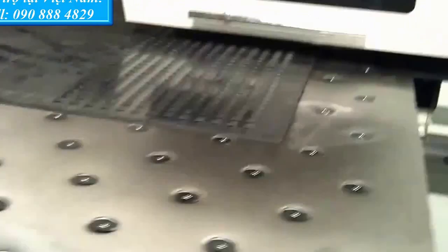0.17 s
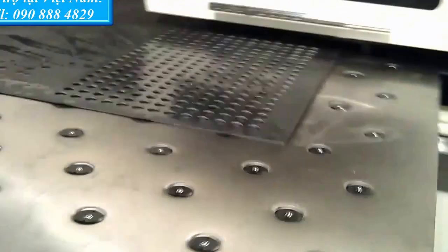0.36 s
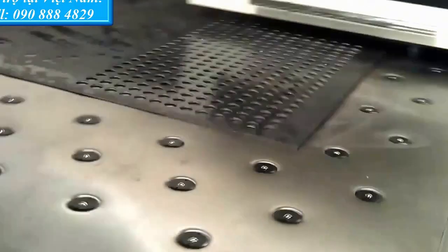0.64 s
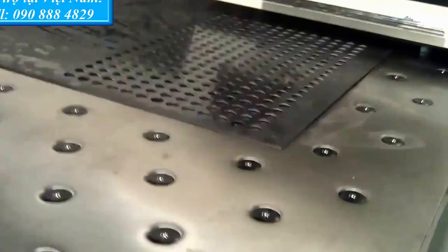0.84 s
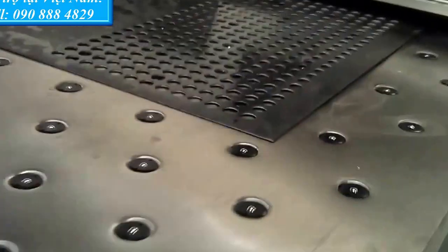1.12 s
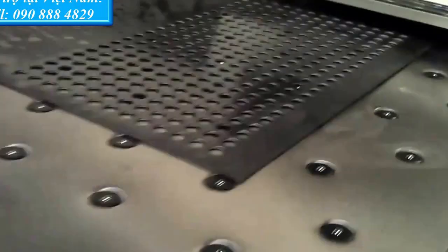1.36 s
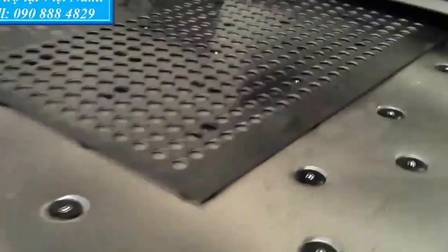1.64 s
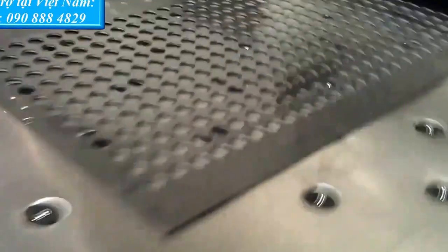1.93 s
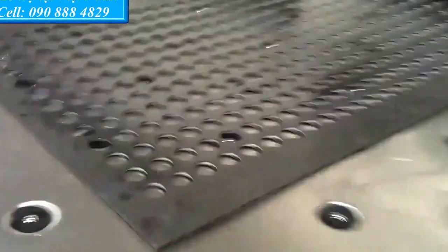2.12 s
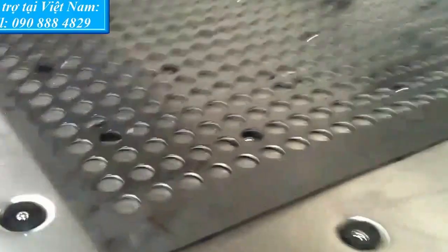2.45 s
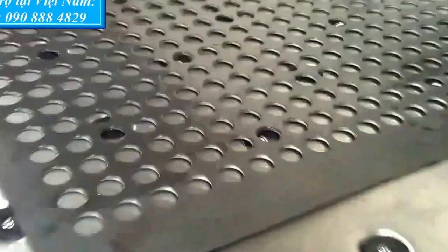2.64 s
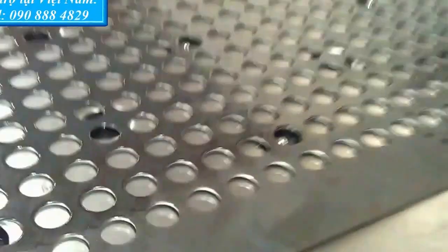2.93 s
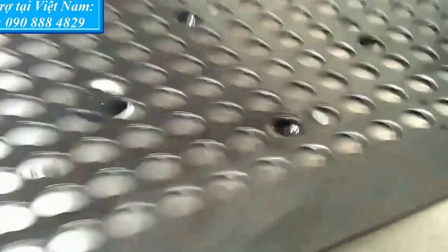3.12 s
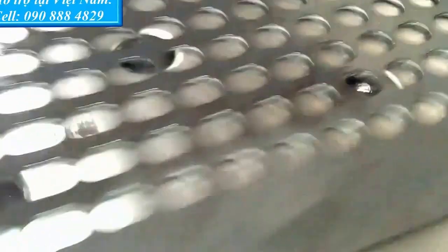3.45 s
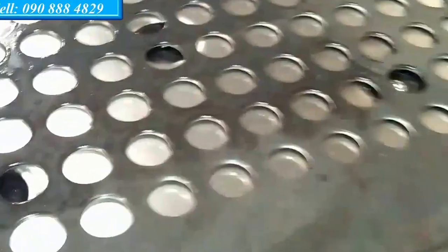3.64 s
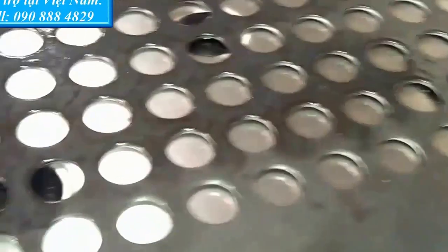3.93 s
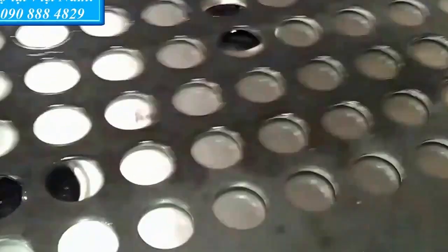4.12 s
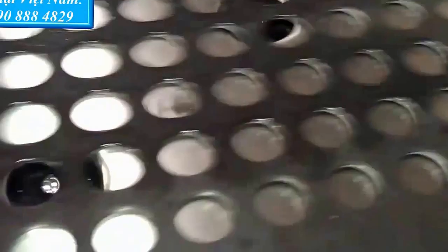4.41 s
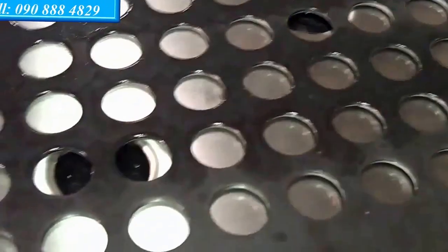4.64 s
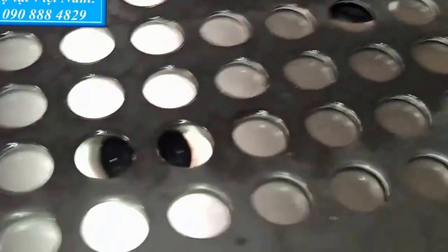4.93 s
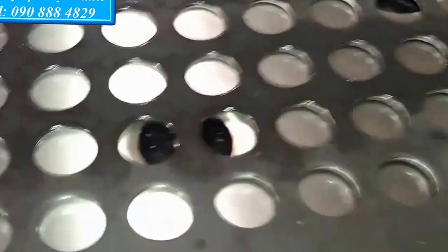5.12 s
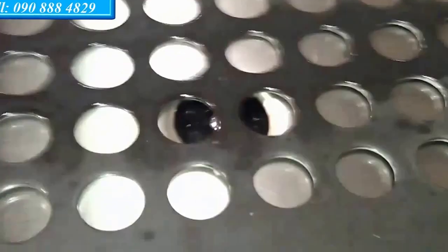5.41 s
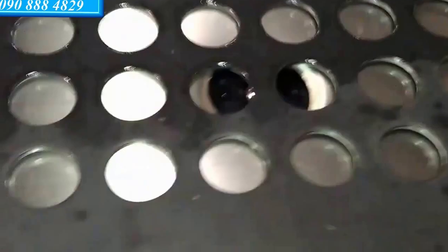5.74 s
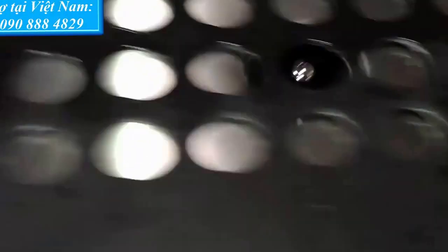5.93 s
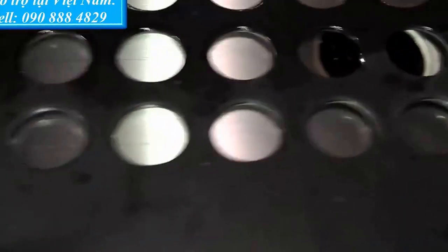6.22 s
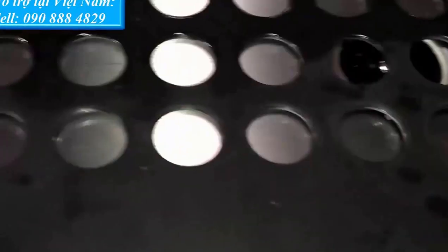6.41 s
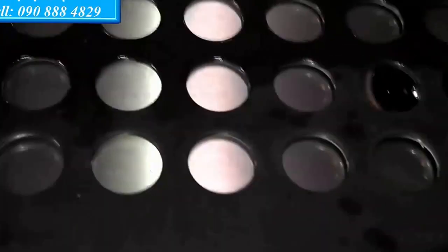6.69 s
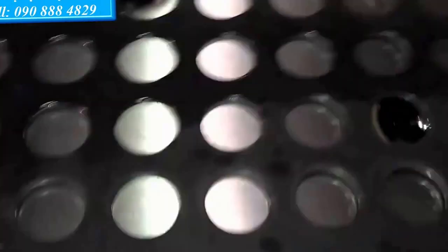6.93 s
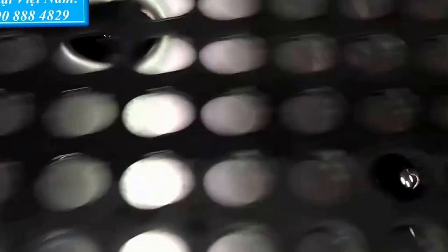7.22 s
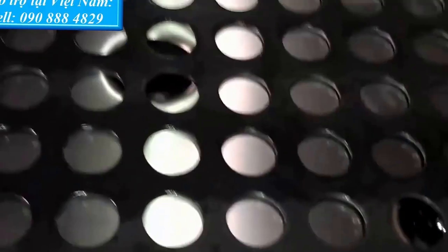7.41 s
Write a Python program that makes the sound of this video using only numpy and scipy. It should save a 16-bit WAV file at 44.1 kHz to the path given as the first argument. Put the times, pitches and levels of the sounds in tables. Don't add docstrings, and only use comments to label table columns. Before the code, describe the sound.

Fast regular punching of sheet steel, heard close in stereo on a workshop floor. Each cycle is a growing rattly scrape, a hard ringing crack, then a light stripper tick and occasional loose bounces. Short whistling squeals lead into many early strokes. Hiss of fans and air stays steady while pump hum gradually fades. The loudest cracks slightly overload and briefly press the background down; near the end dry little clicks of falling slugs appear.

```python
import sys
import numpy as np
from scipy import signal
from scipy.fft import rfft, irfft, next_fast_len
from scipy.io import wavfile
from scipy.ndimage import uniform_filter1d, map_coordinates

SR = 44100
rng = np.random.default_rng(int(sys.argv[2]) if len(sys.argv) > 2 else 0)


def gain_from_db(level_db):
    decades = np.asarray(level_db, float) / 20
    return 10 ** decades


def persist_wave(psi):
    counts = np.round(np.clip(psi, -1, 1) * 32767).astype(np.int16)
    wavfile.write(sys.argv[1], SR, np.atleast_2d(counts).T)


N = 333396


def along(points, hz, column=1):
    table = np.transpose(points)
    return np.interp(np.log(hz + 1), np.log(table[0] + 1), table[column])


def unit(x):
    return x / np.sqrt(np.mean(x ** 2) + 1e-20)


def filtered(x, response):
    n = x.shape[-1]
    m = next_fast_len(n + 4096)
    return irfft(rfft(x, m) * response(np.fft.rfftfreq(m, 1 / SR)), m)[..., :n]


def resonance(hz, centre, width):
    return 1 / (1 + ((hz - centre) / width) ** 2)


def wobble(rate):
    knots = rng.standard_normal(int(N * rate / SR) + 4)
    return map_coordinates(knots, [np.arange(N) * rate / SR])


def rush(spectrum, patchy_db, grain_db=0.):
    z = signal.stft(rng.standard_normal((2, N + 512)), nperseg=512)[2]
    field = rng.standard_normal(z.shape[1:])
    field = uniform_filter1d(field, size=5, axis=0)
    field = uniform_filter1d(field, size=4, axis=1)
    pair = signal.istft(z * gain_from_db(patchy_db * unit(field)), nperseg=512)[1][:, :N]
    jolted = pair * gain_from_db(grain_db * wobble(250))
    return unit(filtered(jolted, lambda hz: gain_from_db(along(spectrum, hz))))


def swell(lead_s, level_db):
    at = np.array(STROKES)[:, :1] + lead_s
    return gain_from_db(np.interp(np.arange(N) / SR, at.ravel(), np.ravel(level_db)))


# t/s, level/dB
SHOP_LEVEL = [(0, -29.5), (.3, -28), (.8, -28), (2.3, -26.5), (2.7, -26.5), (3.3, -26), (4.5, -27),
              (5.4, -24.5), (5.8, -28.5), (7.56, -26.5)]
# f/Hz, density/dB
HISS = [(150, -90), (500, -3), (900, -25), (1550, -7), (2630, -4.5), (4300, -3), (6200, -4), (8600, -2),
        (10500, -4.5), (12000, -12), (14000, -15.5)]
# f/Hz, density/dB
HUM = [(18, -68), (30, -40), (162, -11), (269, -2), (418, -4), (610, -2), (819, 1.5), (1010, -6),
       (1500, -11.5), (1950, -12), (3300, -120)]


def shop():
    t = np.arange(N) / SR
    hiss_db = np.interp(t, *np.transpose(SHOP_LEVEL))
    hum_db = hiss_db + 0.37 - 0.97 * t
    hiss = gain_from_db(hiss_db + 1.54 * wobble(9)) * rush(HISS, patchy_db=2.0)
    hum = gain_from_db(hum_db + 0.17 * wobble(8.4)) * rush(HUM, patchy_db=2.5)
    return hiss + hum


def jet():
    jet_hz, width_hz = 8670, 410
    t = np.arange(N) / SR
    colour = lambda hz: resonance(hz, jet_hz, width_hz) + 0.24 * (hz > jet_hz)
    band = filtered(rng.standard_normal((2, N)), colour)
    level_db = np.interp(t, *np.transpose(SHOP_LEVEL)) - 17.5 + 1.5 * t
    return gain_from_db(level_db) * unit(band)


# f/Hz, density/dB
BLOW_COLOUR = [(59, -44), (100, -5.5), (933, -7.5), (1810, -4), (3030, -6.5), (3290, -6), (4980, -5),
               (6250, -4.5), (9260, -4.5), (14000, -13)]


def plain(hz):
    return gain_from_db(along(BLOW_COLOUR, hz))


def burst(colour, rise_s, hold_s, fall_db_s):
    t = np.arange(3000) / SR
    noise = unit(filtered(rng.standard_normal((2, len(t))), colour))
    return noise * gain_from_db(fall_db_s * np.maximum(t - hold_s, 0)) * (1 - np.exp(-(t / rise_s) ** 2))


# t/s, peak level/dB
SLUGS = [
    (6.4305, -8),
    (6.453, -16),
    (6.7237, -5),
    (6.7435, -9.5),
    (6.748, -17),
    (7.013, -12),
    (7.3253, -10),
    (7.3911, -3),
]


def slugs():
    out = np.zeros((2, N + SR))
    for s, db in SLUGS:
        click = burst(plain, rise_s=0.00032, hold_s=0.00068, fall_db_s=-9000)
        out[:, round(s * SR):][:, :3000] += gain_from_db(db - 3) * click
    return out[:, :N]


# end t/s, length/s, f/Hz, level/dB
SQUEALS = [(0.188, 0.135, 9840, -16), (0.489, 0.09, 9850, -30), (.82, .07, 10230, -28),
           (1.132, 0.072, 10240, -19), (1.447, 0.17, 10100, -19.5), (1.762, 0.092, 10160, -17),
           (2.067, 0.11, 10100, -29), (2.708, 0.055, 10440, -22), (3.01, 0.065, 10230, -16.5),
           (3.322, 0.084, 10040, -19), (4.575, 0.083, 10720, -24), (5.198, .06, 10300, -24),
           (5.517, 0.055, 10440, -47), (5.838, 0.06, 8500, -17)]


def squeals():
    width_hz, grows_db = 120, 14.5
    out, t = np.zeros((2, N)), np.arange(N) / SR
    grip_db = 2.4 * wobble(45)
    for end, length, hz, db in SQUEALS:
        on = slice(round((end - length) * SR), round(end * SR))
        tone = filtered(rng.standard_normal((2, 8192)), lambda f: np.exp(-.5 * ((f - hz) / width_hz) ** 2))
        left = (end - t[on]) / length
        gain = gain_from_db(db - grows_db * left + grip_db[on]) * np.sqrt(np.abs(1 - left ** 4))
        out[:, on] += gain * unit(tone)[:, :len(left)] * [[1], [.5]]
    return out


# f/Hz, density/dB
BOOM = [(18, -70), (30, -56), (70, -31.5), (114, -12.5), (243, -0.5), (340, -2.5), (450, -5), (600, -12.5),
        (900, -35.5)]
# t/s, peak level/dB, knock level/dB against the tick
BOUNCES = [(0.1753, -6, -14), (0.3665, -15.5, 4), (0.7307, -23, -19), (2.3214, -23, -8), (2.9308, -10, -3),
           (2.9647, -9.5, 4), (3.2418, -13, -17), (3.867, -9, -8), (4.7862, -11, 0.5), (5.104, -7, -23),
           (5.089, -13.5, -1), (5.181, -10.5, 5.5), (5.41, -20, -3), (5.7449, -10.5, 3), (5.805, -7.5, -16),
           (6.7224, -11, -6), (6.7442, -15, -14), (7.0516, -10, -26), (7.076, -7, -21), (7.323, -15, -15),
           (7.348, -12, -6)]


def ticks():
    out = np.zeros((2, N + SR))
    tick_t60_s = 0.064
    tick_colour = lambda hz: plain(hz) / (1 + (1800 / (hz + 1)) ** 2)
    knock_colour = lambda hz: gain_from_db(along(BOOM, hz))
    stripper = [(s + .0968, db, -13) for s, *_, db in STROKES]
    for s, db, knock_db in stripper + BOUNCES:
        bright = burst(tick_colour, rise_s=0.0024, hold_s=0.0031, fall_db_s=-60 / tick_t60_s)
        dull = burst(knock_colour, rise_s=0.0028, hold_s=0.0079, fall_db_s=-350)
        contact = gain_from_db(db - 7) * bright + gain_from_db(db + knock_db - 14.0) * dull
        out[:, round((s - .001) * SR):][:, :3000] += contact
    return out[:, :N]


def chatter():
    per_s, ring_hz, width_hz = 140, 4700, 500
    hit, size = rng.random((2, N))
    clicks = (hit < per_s / SR) * gain_from_db(-3 * np.log(size + .02)) * [[1], [.3]]
    ring = lambda f: 1j * f * width_hz / (ring_hz ** 2 - f * f + 1j * f * width_hz)
    return unit(filtered(clicks, ring))


# f/Hz, density/dB
CLANG = [(250, -54), (430, -6.5), (560, 0), (700, 1), (860, -1), (1000, -4.5), (1300, -15), (2000, -12.5),
         (3000, -26.5)]
# f/Hz, density/dB
RATTLE = [(600, -41), (1300, -6), (2520, -8.5), (4500, -5), (6300, -9.5), (9000, -4.5), (10800, -15),
          (12000, -20.5), (14000, -64)]
# lead of full speed/s, boom level/dB, run-up level 63 ms before/dB, brightness/dB
DRAGS = [(0.025, -27, -4, 3.5), (0.016, -29, -2, 9), (0.041, -19.5, -6.5, 1.7), (.018, -22, -3, 2),
         (0.012, -23, -5.5, 0.5), (.018, -27.5, -7.5, 4.5), (.017, -12.5, -14.5, -5.5),
         (0.019, -20.5, -10.5, 0.5), (.013, -17.5, -16.5, -1), (0.006, -23.5, -9.5, -2.5),
         (.018, -18, -12.5, -4.5), (0.063, -16.5, -7.5, -2.5), (0.0107, -22.5, -3.5, 0.5),
         (0.019, -9.5, -14, -9), (0.022, -15.5, -9.5, -5), (0.01, -18.5, -8, -2), (0.012, -23.5, -19, 0.5),
         (0.025, -25.5, -6, 2), (0.062, -17, -8, -2), (0.02, -10.5, -15.5, -6), (0.021, -33, -3, 3.5),
         (0.037, -34.5, 4.5, 4), (0.036, -11.5, -23, -7), (.011, -14, -15.5, -5)]


def sheet():
    lead_s, late_db, runup_db, bright_db = np.transpose(DRAGS)[:, :, None]
    early_db, rattle_db = late_db + runup_db, late_db + bright_db
    fade_db = -0.88 * np.array(STROKES)[:, :1]
    clang_db = late_db + 2.5 + 0.55 * bright_db + fade_db
    first_db = early_db + 1.2 + fade_db

    full_speed = np.clip(lead_s, .003, .06) * [0, 0, 0, 1, 0, 0]
    rise_s = [-0.21, -0.12, -0.063, 0.0195, -0.0036, 0.03] - full_speed
    def shape(early, late):
        return swell(rise_s, np.hstack([early - 18, early - 8, early, late, late - 3, late - 35]))

    lag_db = -1.5 + 0.46 * runup_db
    rattle_path_db = lag_db * [1.0, 1.0, 0.41, 0.13, 0, 0.64] + [-11.5, 0.5, -1.5, 2.0, 2.0, -9]
    rattle_gain = swell([-0.15, -0.09, -0.057, -0.0059, -0.012, 0.018], rattle_db + rattle_path_db)

    lumps = wobble(45)
    boom = shape(early_db, late_db) * gain_from_db(1.65 * lumps) * rush(BOOM, patchy_db=1.0)
    clang_beat = gain_from_db(4.0 + 2.2 * lumps + 0.57 * wobble(80))
    clang = shape(first_db, clang_db) * clang_beat * rush(CLANG, patchy_db=2.5)
    contacts = rush(RATTLE, patchy_db=3.0, grain_db=0.7) + gain_from_db(-13) * chatter()
    rattle = rattle_gain * gain_from_db(0.5 * lumps + 1.3 * wobble(60)) * contacts
    return boom + clang + rattle


# t/s, crack level/dB, tool ring f/Hz, tool ring strength/ratio, stripper tick level/dB
STROKES = [(0.185, -8, 4880, 6.5, -19), (0.5005, -4, 4650, 3.3, -15), (0.8163, -7, 5100, 4.5, -17),
           (1.13, -7.5, 4470, 2.4, -17), (1.4406, -7, 4460, 7.8, -9), (1.7563, -6, 4200, 2.5, -16),
           (2.072, -1, 4370, 0.89, -13.5), (2.3845, -2, 4300, 2, -13), (2.7, -3, 6100, 1.1, -17),
           (3.013, -7.5, 4500, 4.3, -9.5), (3.324, -6.5, 4230, 0.21, -7.5), (3.64, -2.5, 4330, 0.66, -12.5),
           (3.9511, -7, 4300, 0.23, -7), (4.263, -2.5, 5150, 0.2, -14), (4.576, -3.5, 5170, 2.1, -13),
           (4.887, -1, 5340, 1.2, -12), (5.204, -4.5, 5300, 2.1, -32), (5.514, -3.5, 5340, 1.8, -12.5),
           (5.832, -11, 6160, 0.76, -13.5), (6.144, 2, 5430, 1.7, -32), (6.459, -16, 5900, 1.4, -17),
           (6.77, -14.5, 3740, 1.7, -32), (7.062, -12.5, 3420, 1.7, -32), (7.3939, -3, 5400, 1.2, -32)]


def punch():
    out = np.zeros((2, N + SR))
    die_hz, die_width_hz = 8500, 860
    for s, db, tool_hz, strength, _ in STROKES:
        lean_db = min(-2 * (db + 3.5), 6) - (s - 3.5)

        def colour(hz):
            tool = 2.26 * strength * resonance(hz, tool_hz, 300)
            die = 1.6 * resonance(hz, die_hz, die_width_hz)
            return plain(hz) * (hz > 2500) * (1 + tool + die)

        crack = gain_from_db(db + 1.6) * burst(colour, rise_s=0.0014, hold_s=0.004, fall_db_s=-2600) * [[1], [.8]]
        crack[1] += crack[0] * (lean_db - 4.0) / 17
        frame = gain_from_db(db - 6.5) * burst(plain, rise_s=0.0012, hold_s=0.0045, fall_db_s=-900)
        out[:, round(s * SR):][:, :3000] += crack + frame
    return out[:, :N]


# f/Hz, likeness/0-1, left lead/rad, left over right level/dB
PORTS = [(131, 0.84, 0.05, 4), (259, 1, 0.25, -0.5), (484, 0.53, 1.96, 1), (627, 0.68, 2.99, -1),
         (1003, 0.3, 4.18, 0.5), (1410, 0.2, 7.8, -0.4), (4300, 0.26, 5.63, 4), (8100, 0.14, 6.87, 0.5),
         (14000, 0.74, 8.15, 7)]


def ports(pair):
    turn = lambda hz: np.arccos(np.clip(along(PORTS, hz), 0, 1)) / 2
    mid, side = filtered(pair, lambda hz: np.array([np.cos(turn(hz)), np.sin(turn(hz))]))
    def lean(hz):
        return np.exp(.5j * along(PORTS, hz, column=2)) * gain_from_db(along(PORTS, hz, column=3) / 2)
    return filtered(np.array([mid + side, mid - side]), lambda hz: np.array([lean(hz), 1 / lean(hz)]))


def scene():
    return ports(shop() + jet() + slugs() + squeals() + ticks() + sheet() + punch())


def ducking():
    depth = np.clip(np.transpose(STROKES)[1, :, None] + 20, 0, 20) / 14
    return swell([0., .02, .045, .09, .14], depth * [0.5, 1.5, -4.5, -0.8, -2.0])


# f/Hz, level against the mean of 3-10.5 kHz/dB
TREBLE_FLOOR = [(3000, -14), (8000, -8), (10500, -5), (12000, -7), (14000, -6)]


def thinned(x):
    hz, _, z = signal.stft(x, SR, nperseg=2048)
    size = np.abs(z)
    loudness = size[:, (hz > 3000) & (hz < 10500)].mean(axis=1, keepdims=True)
    limit = gain_from_db(along(TREBLE_FLOOR, hz))[:, None] * loudness
    return signal.istft(z * (size > limit), SR, nperseg=2048)[1][:, :N]


def top_cut(x):
    return signal.sosfilt(signal.butter(12, 14240, fs=SR, output="sos"), x)


def record(dry):
    ducked = dry * ducking()
    clipped = ducked / (1 + np.abs(ducked / .88) ** 6) ** (1 / 6)
    def band(hz):
        low_cut = .45 + .55 * np.clip(hz / 90, 0, 1) ** 2
        return np.clip((14250 - hz) / 250, 0, 1) * low_cut
    mix = thinned(filtered(clipped, band))
    return top_cut(mix)


dry = scene()
out = record(dry)
persist_wave(out)
```